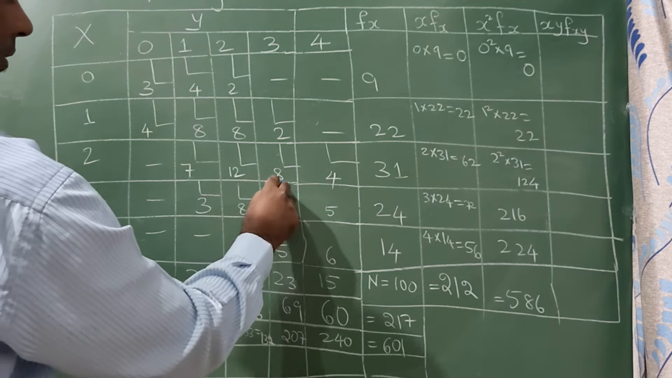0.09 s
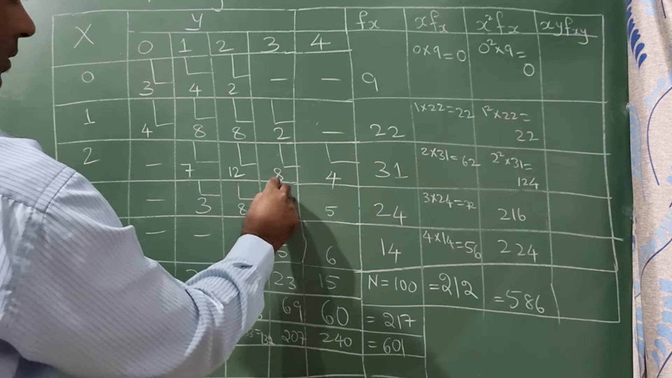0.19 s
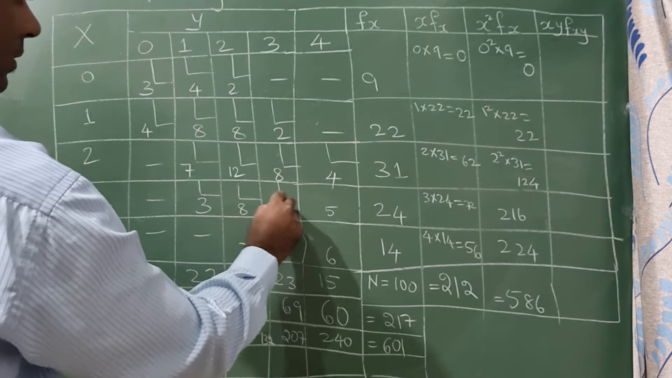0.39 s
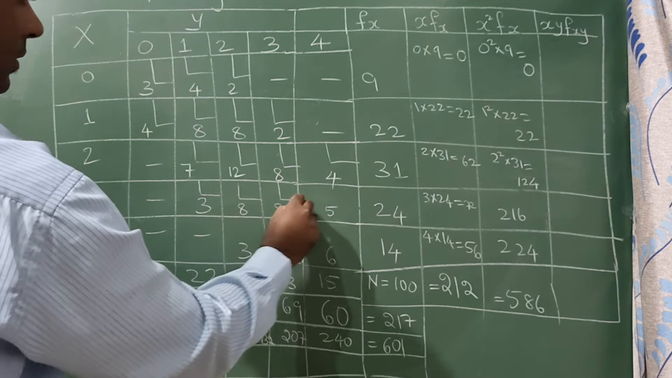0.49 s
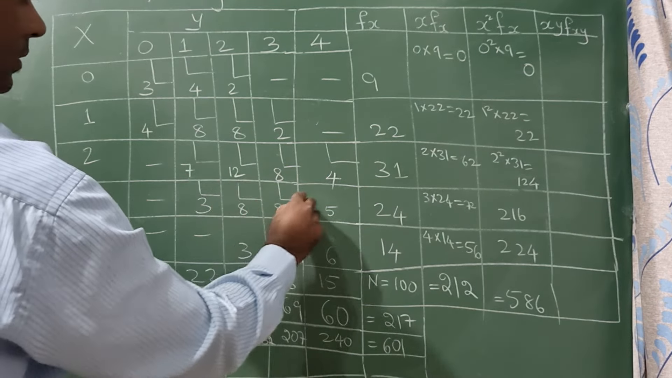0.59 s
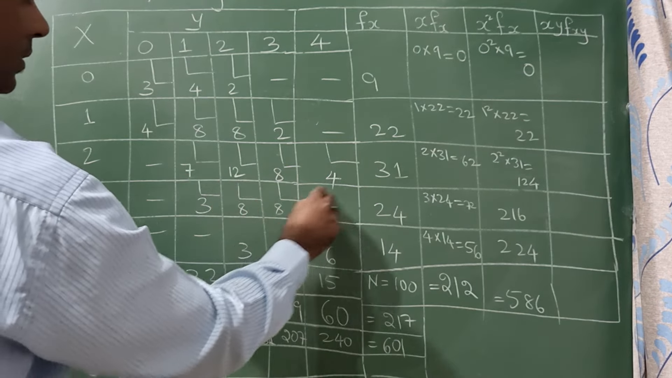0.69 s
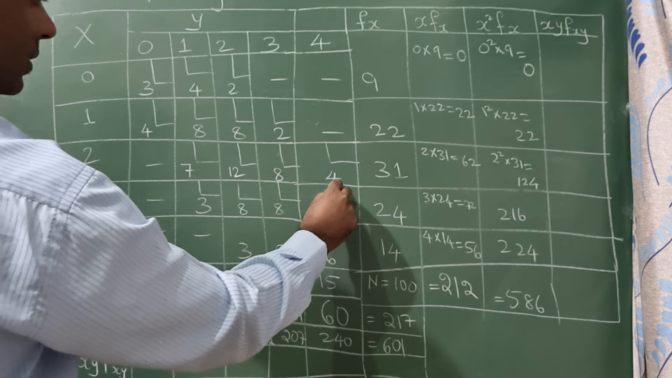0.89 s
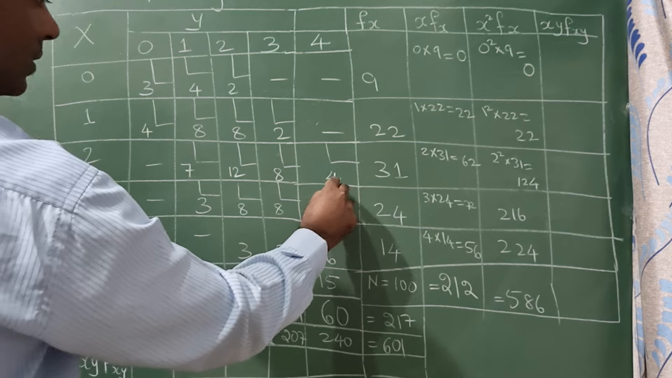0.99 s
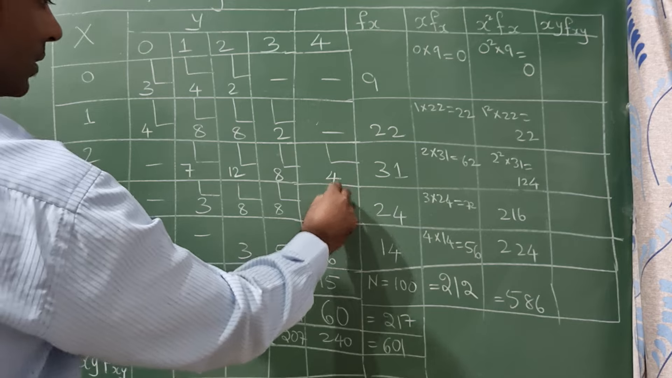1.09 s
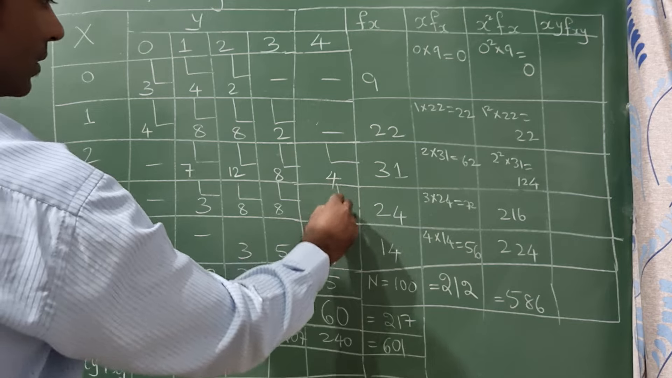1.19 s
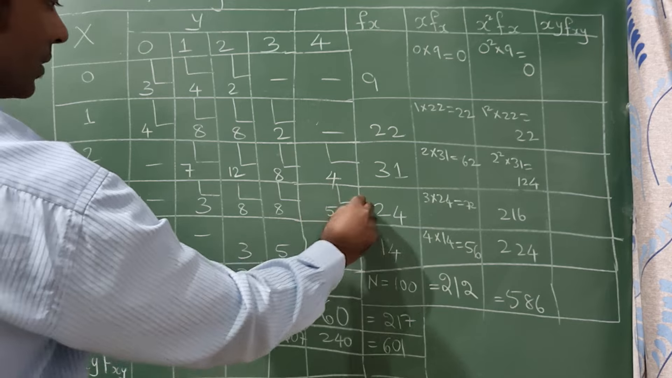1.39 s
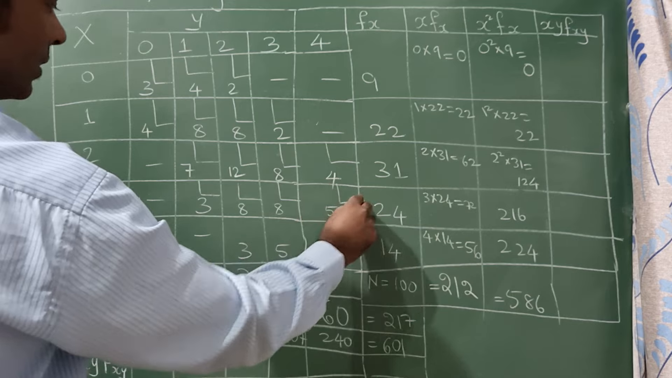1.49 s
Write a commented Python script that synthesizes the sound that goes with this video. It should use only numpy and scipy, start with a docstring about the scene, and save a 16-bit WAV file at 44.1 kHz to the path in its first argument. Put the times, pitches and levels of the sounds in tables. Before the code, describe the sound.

Chalk taps a chalkboard, slides lightly and scrapes, then does it again with a softer tap. A sleeve brushes faintly before each mark. The knocks ring briefly in a bare classroom, over quiet rumble and hiss at the microphone.

```python
"""Chalk writes two short marks on a wall chalkboard, heard at one microphone in a bare classroom.
Each mark starts with a knock that rings the board; the chalk slides on lightly, then scrapes a firmer
second stroke, its tiny slips hissing at the tip and shaking the board. A sleeve brushes faintly.
The room prolongs the knocks and the far wall returns them, over a low rumble and faint hiss."""
import sys
import numpy as np
from scipy import signal
from scipy.fft import rfft, irfft, next_fast_len
from scipy.io import wavfile

SR = 44100
rng = np.random.default_rng(int(sys.argv[2]) if len(sys.argv) > 2 else 0)


def transcribe(signal):
    """Save signal, clipped to [-1, 1], as a 16-bit WAV file at the path in sys.argv[1]."""
    frames = np.atleast_2d(signal).T
    limited = np.clip(frames, -1, 1)
    pcm = np.round(limited * 32767).astype(np.int16)
    wavfile.write(sys.argv[1], SR, pcm)


N = 66150

# Chalk landing on the board: start_s, weak_modes_db, knock_db, click_db, click_tilt_db_per_octave
LANDINGS = [(.2303, -17, -10, -29, -2), (1.0884, -22, -21, -40.5, 0)]
# Strong board modes: pitch_hz, t60_s, first_spot_db, second_spot_db
BOARD_MODES = [(179.5, 1, -43, -41.5), (241.9, 0.82, -31.5, -71), (279.9, 0.78, -31, -58),
               (326.5, 0.18, -60, -23.5), (376.7, 0.31, -15.5, -28.5), (393.4, 0.3, -22, -31),
               (480.8, 0.41, -20.5, -33), (543, 0.26, -19, -31.5), (630, 0.71, -47, -32),
               (648, 0.51, -29.5, -33.5), (673, 0.47, -25.5, -30), (802.6, 0.288, -17.5, -21.5),
               (866, 0.31, -25.5, -22), (918, 0.25, -51, -19), (986.4, 0.38, -22.5, -27.5),
               (1126.6, 0.3, -27, -24), (1252, 0.25, -26, -31), (1500, 0.13, -23, -43),
               (1943, 0.18, -37.5, -52)]
# Spectrum of the weaker board and room modes: pitch_hz, first_spot_db, second_spot_db
WEAK_MODE_SPECTRA = [(89.84, -21, -22), (200, -19.5, -17), (304, -14.5, -11.5), (464, -9, -16),
                     (497, 0.5, -1.5), (710, -2, 1), (970, 2, 1), (1110, -7.5, -0.5), (1400, -8, -7.5),
                     (1610, -12.5, -6), (2010, -18.5, -18), (2090, -28, -26.5), (3630, -33.5, -44),
                     (5070, -47, -43)]
# Click at the chalk tip: pitch_hz, level_db
CLICK_SPECTRUM = [(1500, -6.5), (2600, 3.5), (3700, 6), (5000, -8), (8000, -12), (10500, -9), (12500, -9),
                  (15500, -9)]
def chalk_taps():
    """At the wall, the tip clicks, the board gives a dull knock, and board and room ring on."""
    out, t = np.zeros(N), np.arange(int(0.6 * SR)) / SR
    modes, spectra = np.array(BOARD_MODES), np.array(WEAK_MODE_SPECTRA)
    build_s = 0.0026  # the ring needs time to spread over the board
    for spot, (start_s, weak_db, knock_db, click_db, tilt_db) in enumerate(LANDINGS):
        spectrum = spectra[:, [0, spot + 1]]
        ring = ringing(modes[:, 0], amp(modes[:, spot + 2]), modes[:, 1], t)
        ring += amp(weak_db) * weak_modes(spectrum, t)
        ring *= 1 - np.exp(-t / build_s)
        knock = amp(knock_db) * board_knock(spectrum, t)
        tilted = [(hz, db + tilt_db * np.log2(hz)) for hz, db in CLICK_SPECTRUM]
        click = coloured(rng.standard_normal(N), tilted)[:len(t)] * fade(t, t60_s=0.036)
        out += placed(ring + knock + amp(click_db) * click, start_s)
    return out


def board_knock(spectrum, t, top_hz=1180, attack_s=0.00054):
    """The struck board answers at once with a short, dull burst."""
    dull = filtered(rng.standard_normal(N), lambda hz: 1 / np.sqrt(1 + (hz / top_hz) ** 8))
    envelope = fade(t, t60_s=0.12) * (1 - np.exp(-(t / attack_s) ** 2))
    return unit(coloured(dull, spectrum)[:len(t)] * envelope) * np.sqrt(np.mean(envelope ** 2))


# Decay of the weaker modes: pitch_hz, t60_s
WEAK_MODE_DECAY = [(150, 1), (400, 0.59), (1000, 0.38), (1800, 0.33), (4000, 0.58)]
def weak_modes(spectrum, t, count=290, spacing_hz=9):
    """Closely spaced board and room modes, sparser in the treble, together starting at rms 1."""
    rank = np.arange(count) + rng.random(count)
    hz = spectrum[0][0] + spacing_hz * rank * (1 + (rank / count) ** 4)
    gain = amp(along(spectrum, hz)) * np.sqrt(np.gradient(hz))
    return ringing(hz, gain * np.sqrt(2) / np.linalg.norm(gain), along(WEAK_MODE_DECAY, hz), t)


def ringing(hz, gain, t60_s, t):
    """Damped sines whose phases drift: the ring blurs as it travels round the room."""
    hz, gain, t60_s, t = (np.asarray(v, np.float32) for v in (hz, gain, t60_s, t))
    steps = rng.standard_normal((len(hz), len(t) // 256 + 1)).astype(np.float32) / 16
    drift = 0.015 * np.cumsum(np.repeat(steps, 256, axis=1)[:, :len(t)], axis=1)
    phase = (2 * np.pi * rng.random((len(hz), 1))).astype(np.float32) + drift
    loss = np.float32(np.log(1000)) / t60_s[:, None]
    return gain @ (np.sin(2 * np.pi * hz[:, None] * t + phase) * np.exp(-loss * t))


# Strokes across the board: peak_s, rise_s, fall_s, grit_db, stick_db, stick_hz,
# rub_db, rub_lag_s, body_db, note_db, note_hz
CHALK_STROKES = [(.362, 0.1, 0.07, -49.5, -56, 11820, -59, .01, -52, -68, 1100),
                 (0.55, 0.046, 0.032, -48.5, -48.5, 11430, -43.5, 0.033, -41, -52, 1070),
                 (1.228, 0.12, 0.096, -51, -63.5, 11800, -62, 0.0076, -68, -79, 1090),
                 (1.426, 0.049, 0.059, -45, -55, 11250, -42, 0.0075, -46.5, -46.5, 1143)]
# Grit at the tip: pitch_hz, level_db
GRIT_SPECTRUM = [(1500, 5), (2300, -4.5), (4300, 0.5), (5100, -4.5), (6100, 2), (7600, -7), (10000, -3.5),
                 (12500, -5), (14200, 1.5), (15600, -7.5)]
# Rub on the board's face: pitch_hz, level_db
RUB_SPECTRUM = [(300, -28), (700, -18), (950, 6.5), (1220, -1), (1560, -0.5), (1800, -9), (2600, -13.5),
                (4000, -40)]
# The board's low modes under a stroke: pitch_hz, level_db
BODY_SPECTRUM = [(150, -28), (240, -3), (380, 2.5), (650, 1), (850, 2), (1200, -26)]
def chalk_strokes():
    """Slips hiss at the tip, ring the chalk stick and shake the board, following the hand's speed."""
    tip, board, body = np.zeros((3, N))
    for (peak_s, rise_s, fall_s, grit_db, stick_db, stick_hz,
         rub_db, rub_lag_s, body_db, note_db, note_hz) in CHALK_STROKES:
        slips, speed = chalk_slips(), swell(peak_s, rise_s, fall_s)
        tip += amp(grit_db) * speed * coloured(slips, GRIT_SPECTRUM)
        tip += amp(stick_db) * speed * resonant(chalk_slips(), stick_hz, width_hz=1240)
        rub = swell(peak_s + rub_lag_s, rise_s, fall_s) ** 1.46  # grows as a power of the speed
        board += amp(rub_db) * rub * coloured(slips, RUB_SPECTRUM)
        board += amp(note_db) * speed * resonant(chalk_slips(), note_hz, width_hz=160)
        body += amp(body_db) * speed * coloured(slips, BODY_SPECTRUM)
    tip += amp(-9) * classroom(tip, t60_s=0.22)
    board += amp(-1.5) * classroom(board, t60_s=0.34)
    return tip + board + classroom(body, t60_s=0.54)  # the body arrives only by way of the room


def chalk_slips(per_s=5000, spread_db=2):
    """Chalk crumbling: dense tiny slips of uneven size."""
    slips = (rng.random(N) < per_s / SR) * np.sign(rng.standard_normal(N))
    return slips * amp(spread_db * rng.standard_normal(N))


# Cloth near the board: peak_s, half_length_s, level_db, pitch_hz, width_hz
SLEEVE_BRUSHES = [(0.185, 0.012, -55.5, 3500, 1830), (.212, 0.04, -52.5, 1060, 2080),
                  (.96, 0.027, -63, 8300, 2500)]
def sleeve():
    """Soft brushes as the hand moves to the next mark."""
    return sum(amp(db) * swell(peak_s, half_s, half_s) * resonant(rng.standard_normal(N), hz, width_hz)
               for peak_s, half_s, db, hz, width_hz in SLEEVE_BRUSHES)


def classroom(x, t60_s):
    """The bare room's diffuse answer at the microphone."""
    t = np.arange(SR // 2) / SR
    tail = rng.standard_normal(len(t)) * fade(t, t60_s)
    return signal.fftconvolve(x, tail / np.linalg.norm(tail))[:N]


def far_wall(x, delay_s=0.0767, spread_s=0.021, relative_db=-13.5):
    """A late, dull, scattered echo from across the room."""
    scatter = coloured(rng.standard_normal(N), [(2000, -1), (4000, -14)])
    scatter *= swell(delay_s, spread_s / 2, spread_s)
    return amp(relative_db) * np.std(x) * unit(signal.fftconvolve(x, scatter)[:N])


# The classroom's background: pitch_hz, density_db
ROOM_TONE_SPECTRUM = [(22, -28), (40, -6.5), (60, 4), (80, -2), (160, -5), (300, -15.5), (650, -16),
                      (1100, -23), (2200, -26.5), (6000, -29), (11000, -31.5), (14000, -28), (16000, -32.5)]
def room_tone():
    """Steady low rumble and faint hiss around the microphone."""
    return amp(-48.5) * coloured(rng.standard_normal(N), ROOM_TONE_SPECTRUM)


def amp(db):
    """Decibels to gain."""
    return 10 ** (np.asarray(db) / 20)


def unit(x):
    """Scale to rms 1."""
    return x / np.sqrt(np.mean(x ** 2) + 1e-20)


def along(points, hz):
    """(Hz, value) points read on a log axis."""
    points_hz, values = np.transpose(points)
    return np.interp(np.log(hz + 1), np.log(points_hz + 1), values)


def filtered(x, response):
    """x through a frequency response."""
    size = next_fast_len(N + SR // 2)
    return irfft(rfft(x, size) * response(np.fft.rfftfreq(size, 1 / SR)), size)[..., :N]


def coloured(x, spectrum):
    """x through a spectrum, at rms 1."""
    return unit(filtered(x, lambda hz: amp(along(spectrum, hz))))


def resonant(x, centre_hz, width_hz):
    """x through one steep resonance, at rms 1."""
    def response(hz):
        damping = 1j * hz * width_hz
        return (damping / (centre_hz ** 2 - hz ** 2 + damping)) ** 2
    return unit(filtered(x, response))


def fade(t, t60_s):
    """Free decay."""
    return amp(-60 * t / t60_s)


def swell(peak_s, rise_s, fall_s):
    """A smooth rise and fall, like the speed of a short movement."""
    t = np.arange(N) / SR - peak_s
    return np.exp(-(t / np.where(t < 0, rise_s, fall_s)) ** 2)


def placed(x, start_s):
    """x starting at start_s."""
    return np.pad(x, (int(round(start_s * SR)), N))[:N]


def scene():
    """Board and room at one microphone, alike in both channels."""
    taps = chalk_taps()
    mono = taps + far_wall(taps) + chalk_strokes() + sleeve() + room_tone()
    return np.array([mono, mono])


def record(dry):
    """The recorder drops the deepest bass and keeps nothing above its band limit."""
    low_cut_hz, top_hz = 36, 15850
    return filtered(dry, lambda hz: hz ** 4 / (hz ** 4 + low_cut_hz ** 4) * (hz < top_hz))


dry = scene()
out = record(dry)
transcribe(out)
```